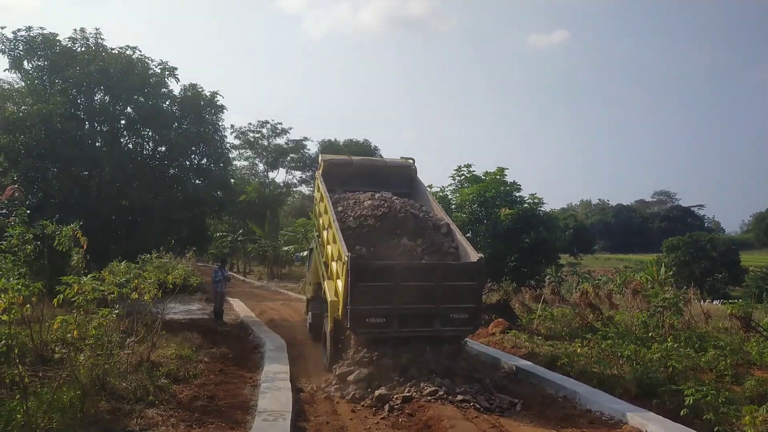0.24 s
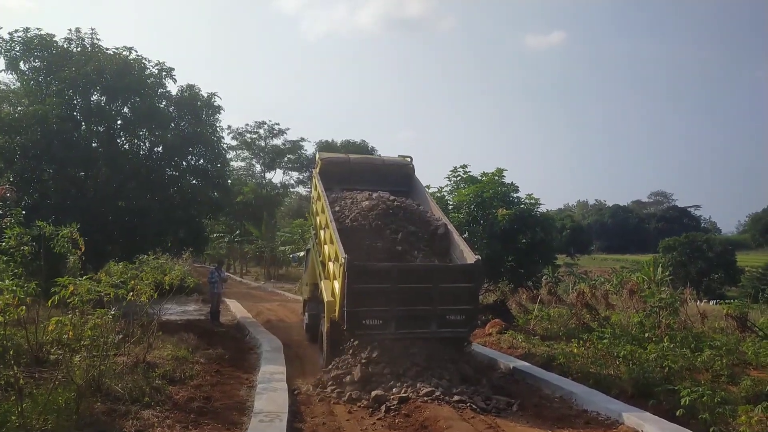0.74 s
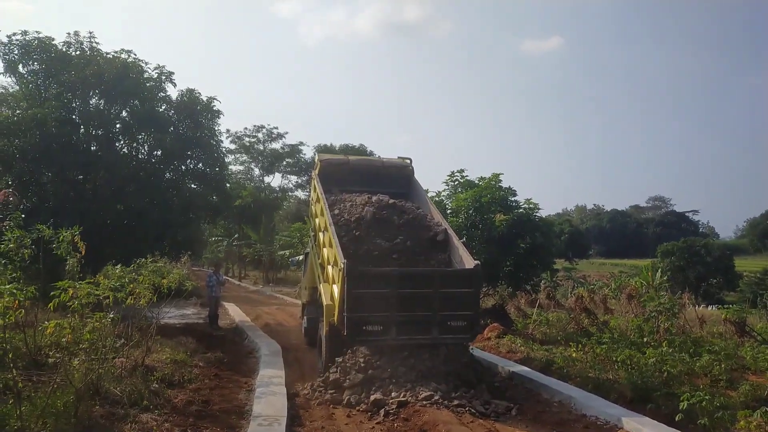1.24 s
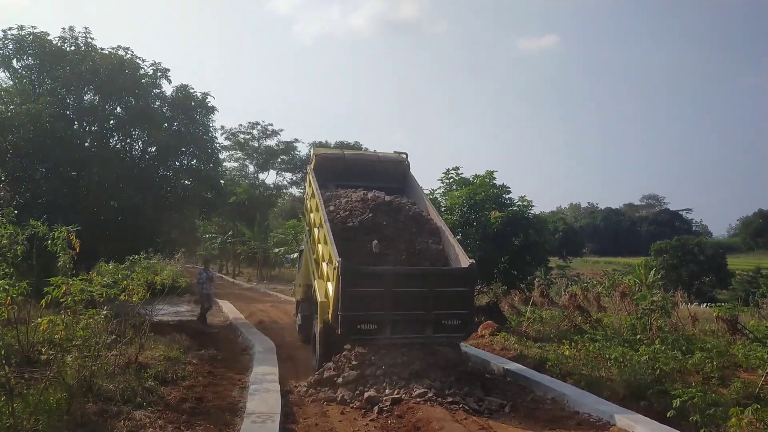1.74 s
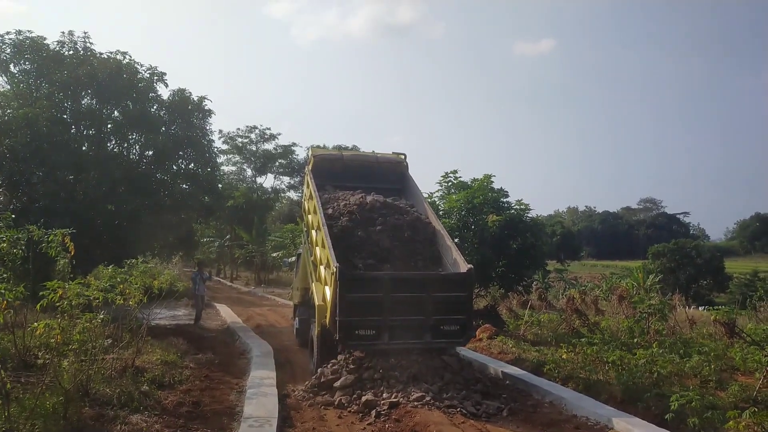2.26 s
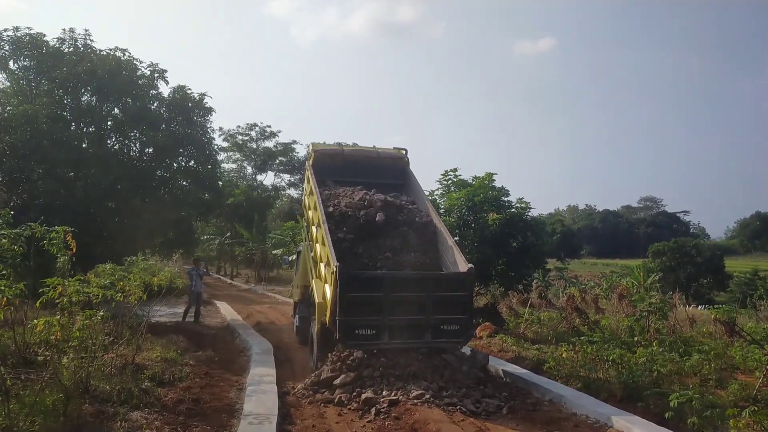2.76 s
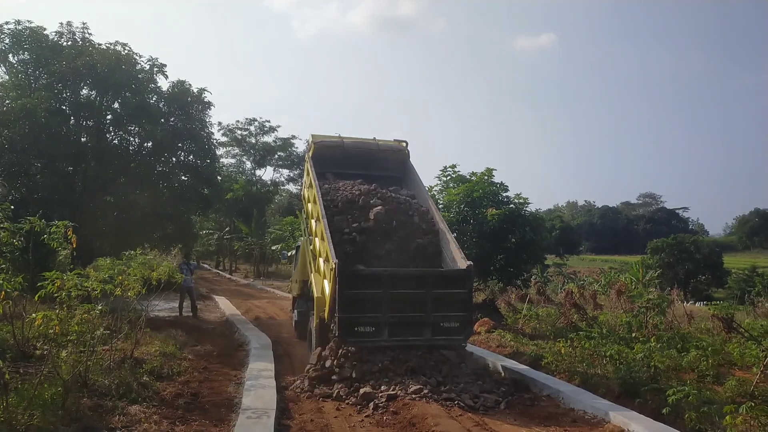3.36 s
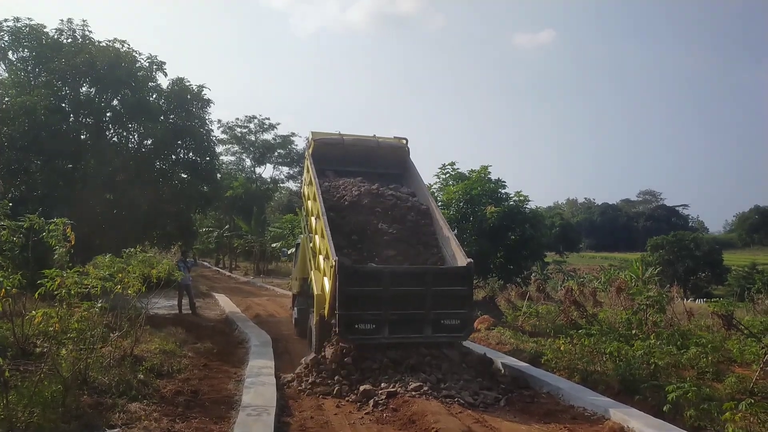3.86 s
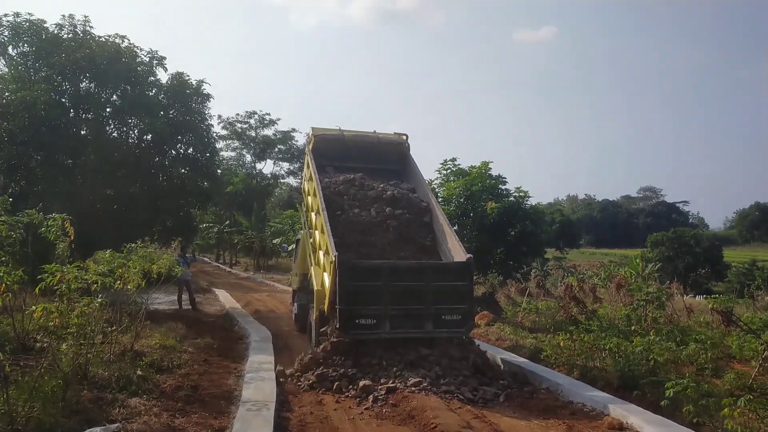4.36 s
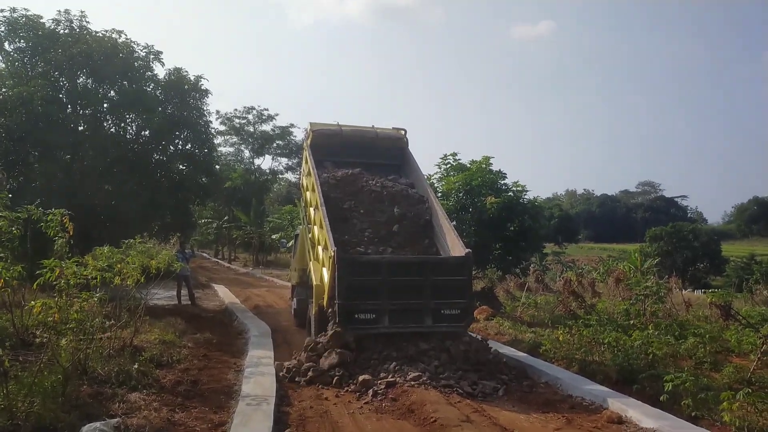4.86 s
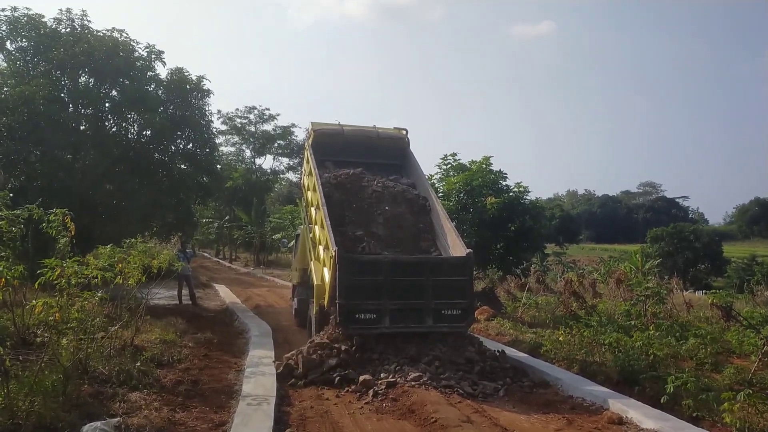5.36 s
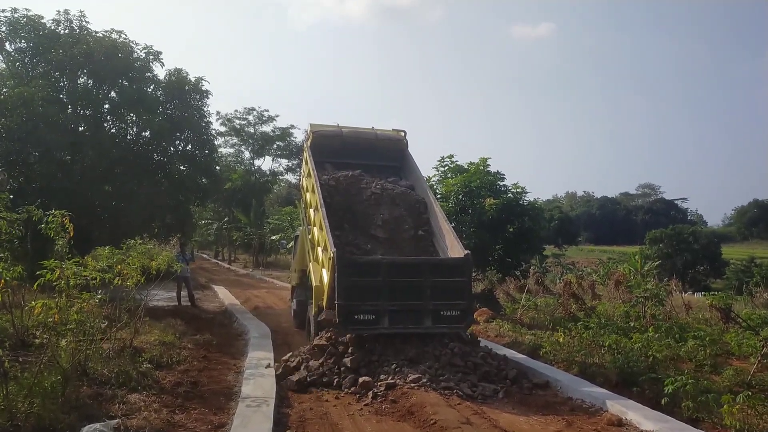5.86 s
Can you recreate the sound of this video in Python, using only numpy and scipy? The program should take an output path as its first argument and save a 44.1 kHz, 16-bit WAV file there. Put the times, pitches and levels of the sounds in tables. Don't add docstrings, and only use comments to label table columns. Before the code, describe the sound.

Rocks slide from the raised steel bed of a tipper truck outdoors. A dense burst of hollow metallic clangs and stone cracks opens at once, another follows before one second, then it thins to a gritty rattle. Near three seconds heavy crashes return and continue unevenly, with low thuds from the heap. A faint engine idle and wind rumble sit below; the single microphone is some way off, with a faint echo from trees.

```python
import sys
import numpy as np
from scipy import signal
from scipy.fft import rfft, irfft, next_fast_len
from scipy.io import wavfile
from scipy.ndimage import uniform_filter1d, minimum_filter1d, map_coordinates

SR = 44100
rng = np.random.default_rng(int(sys.argv[2]) if len(sys.argv) > 2 else 0)


def bounce(signal):
    frames = np.transpose(np.atleast_2d(signal))
    limited = np.clip(frames, -1, 1)
    pcm = np.round(limited * 32767).astype(np.int16)
    wavfile.write(sys.argv[1], SR, pcm)


def nominal_scale(level):
    x = np.asarray(level, float) / 20
    return 10 ** x


N = 269451


def unit(x):
    return x / np.sqrt(np.mean(x ** 2) + 1e-20)


def along(points, hz):
    f, v = np.transpose(points)
    return np.interp(np.log(hz + 1), np.log(f + 1), v)


def curves(rows):
    s, *cols = np.transpose(rows)
    return [np.interp(np.arange(N) / SR, s, c) for c in cols]


def wobble(rate):
    return map_coordinates(rng.standard_normal(N // 100), [np.arange(N) * rate / SR])


def filtered(x, response):
    m = next_fast_len(x.shape[-1] + 8192)
    return irfft(rfft(x, m) * response(np.fft.rfftfreq(m, 1 / SR)), m)[..., :x.shape[-1]]


def coloured(x, spectrum):
    return unit(filtered(x, lambda hz: nominal_scale(along(spectrum, hz))))


def resonances(modes):
    def response(f):
        total = 0
        for k, (c, w, db) in enumerate(modes):
            total = total + (-1) ** k * nominal_scale(db) * 1j * f * w / (c * c - f * f + 1j * f * w)
        return total
    return response


def lay(start, rings):
    k = np.arange(rings.shape[1])
    return np.bincount((start + k).ravel(), rings.ravel(), N)[:N]


def samples(s):
    return np.round(s * SR).astype(int)


def aftermath(events, db, t60):
    starts = [round(row[0] * SR) for row in events]
    kicks = np.bincount(starts, [nominal_scale(2 * (row[1] + db)) for row in events], N)
    return signal.lfilter([1], [1, -nominal_scale(-120 / (t60 * SR))], kicks)


HEAVY_HZ, THIN_HZ = 850, 1680
# (f/Hz, width/Hz, level/dB)
BED = [(512, 28, -1.5), (655, 75, -1), (964, 102, -0.5), (1320, 136, 0.5), (1580, 74, -3), (1870, 180, 1.5),
       (1943, 243, 0), (2310, 195, -2.5), (2810, 680, -12), (3450, 58, -9.5), (3920, 340, -20)]
# (f/Hz, level/dB)
GRIT = [(2060, -3.5), (3500, -3.5), (5150, -8.5), (6940, -9), (8110, -6), (9480, -14.5), (11800, -14),
        (14800, -13), (15500, -5)]
# (t/s, level/dB, stone crack share/dB, fade by 60 dB/s)
ON_FLOOR = [(.093, -26, -31, 0.1), (.202, -8, -30, 0.16), (.253, -10, -36, 0.059), (.732, -18, -24, 0.2),
            (.939, -19.5, -18, 0.27), (1.147, -11.5, -46, 0.14), (2.438, -18, -22, 0.25),
            (2.831, -15.5, -12.5, 0.33), (3.088, -10, -50, 0.54), (3.344, -11, -40, 0.19),
            (3.748, -11.5, -35, 0.21), (3.837, -13.5, -21, 0.16), (3.872, -20.5, -17, 0.36),
            (3.97, -14, -26, 0.13), (4.116, -16.5, -37, 0.39), (4.161, -18.5, -26, 1),
            (4.37, -14.5, -35, 0.33), (4.495, -26, -32, 0.13), (4.727, -14, -42, 0.035),
            (5.6, -29, -32, 0.1), (5.893, -12, -43, 0.15), (5.438, -17, -25, 0.11)]
# (t/s, level/dB, stone crack share/dB, fade by 60 dB/s)
ON_FRAME = [(.006, -4, -37, 0.17), (.157, -9.5, -22.5, 0.26), (.175, -7.5, -29, 0.2),
            (.337, -6.5, -24.5, 0.22), (.413, -13, -38, 0.35), (.745, -6.5, -24.5, 0.14),
            (.884, -16.5, -24.5, 0.3), (2.049, -16, -49, 0.11), (2.218, -23.5, -23, 0.3),
            (2.281, -18.5, -37, 0.053), (2.31, -9, -28, 0.21), (2.342, -12, -28.5, 0.069),
            (2.841, -8.5, -35, 0.21), (2.914, -3.5, -51, 0.17), (3.166, -8.5, -27.5, 0.17),
            (3.294, -8.5, -32, 0.14), (3.437, -16.5, -40, 0.091), (3.576, -1, -28, 0.072),
            (3.619, -13.5, -29, 0.28), (3.812, -17.5, -44, 0.23), (4.263, -17.5, -25, 0.32),
            (4.3, -7.5, -26.5, 0.17), (4.686, -21, -49, 0.48), (4.835, -16.5, -32, 0.58),
            (4.894, -16, -13.5, 0.11), (5.225, -9.5, -31, 0.089), (5.483, -18, -26, 0.24),
            (5.749, -16, -21, 0.049), (5.758, -16, -29, 0.13), (6.063, -37, -41, 0.058)]
# (t/s, level/dB, stone crack share/dB, fade by 60 dB/s)
ON_WALLS = [(.137, -9, -36, 0.1), (.288, -10, -30.5, 0.53), (.343, -3, -36, 0.077), (.712, 3.5, -37, 0.063),
            (0.806, -9, -29, 0.057), (0.843, -4, -26, 0.18), (1.016, -11, -26.5, 0.69),
            (1.105, -18.5, -22.5, 0.62), (1.22, -12, -24, 0.059), (1.231, -8, -43, 0.061),
            (1.82, -22, -26, 0.077), (1.838, -12, -25, 0.33), (2.867, 2, -27, 0.1),
            (2.932, -22, -45, 0.069), (3.125, -12, -26, 0.32), (3.701, -10, -28, 0.055),
            (3.954, -11, -48, 0.11), (4.044, -17.5, -24.5, 0.36)]
# (t/s, level/dB, stone crack share/dB, fade by 60 dB/s)
ON_GATE = [(0.05, -14, -16, 0.098), (.461, -24, -14.5, 0.33), (0.52, -29, -11.5, 0.41),
           (.664, -28, -11, 0.23), (0.998, -23.5, -12, 0.16), (1.387, -38.5, -2, 0.24),
           (1.429, -30.5, -22, 0.18), (1.529, -24, -17.5, 0.28), (1.682, -36, -32, 0.15),
           (2.617, -41, 0, 0.19), (3.047, -20, -27, 0.4), (3.496, -17, -44, 0.067), (4.46, -28, -17, 0.34),
           (4.536, -35, -61, 0.078), (4.595, -31.5, -9.5, 0.17), (4.787, -26.5, -21, 0.072),
           (4.956, -29, -29, 0.43), (5.119, -15.5, -24.5, 0.14), (5.207, -17, -19.5, 0.25),
           (5.312, -17.5, -36, 0.17), (5.336, -23.5, -4.5, 0.052), (5.366, -25, -33, 0.3),
           (5.654, -33, -7, 0.16), (5.683, -26, -15, 0.053), (6.015, -30, -17, 0.083)]
# (heavy-panel level/dB, thin-panel level/dB)
SHARES = [
    (-7, -15),
    (-9.5, -6.5),
    (-23, -8),
    (-12, 5),
]


def shaken_bed(heavy_db, thin_db):
    modes = []
    for (hz, width, level), (shift, strength) in zip(BED, rng.standard_normal((len(BED), 2))):
        if hz < HEAVY_HZ:
            share = heavy_db + 14.5
        elif hz > THIN_HZ:
            share = thin_db + 8.0
        else:
            share = -1
        modes.append((hz * (1 + 0.015 * shift), width, level + share + 1.64 * strength))
    panels = resonances(modes)
    return lambda hz: panels(hz) / (1 + 1j * hz / 3500) / (1 - 1j * 400 / (hz + 1)) ** 2


def clashes():
    out, t = np.zeros(N + SR), np.arange(SR // 3) / SR
    for rows, shares in zip([ON_FLOOR, ON_FRAME, ON_WALLS, ON_GATE], SHARES):
        for s, db, crack_db, t60 in rows:
            fade_s = max(t60, .02)
            decay = nominal_scale(-60 * (t / fade_s) ** 1.306) * (1 - np.exp(-t / 0.0009))
            decay = decay * (1 + 0.47 * np.exp(-t / 0.068)) / 0.91
            chips = nominal_scale(2.5 * unit(uniform_filter1d(rng.standard_normal(len(t)), size=90)))
            crunch = decay * chips * rng.standard_normal(len(t))
            crunch[:4] += 6.5
            crunch = crunch / np.linalg.norm(crunch) * np.linalg.norm(decay)
            ring = filtered(crunch, shaken_bed(*shares))
            stone = [(hz, level + 3.1 * rng.standard_normal()) for hz, level in GRIT]
            crack = coloured(rng.standard_normal(len(t)), stone)
            crack = crack * nominal_scale(-55 * t / fade_s) * (1 - np.exp(-t / 0.0002))
            out[round(s * SR):][:len(t)] += nominal_scale(db - 4.0) * ring + nominal_scale(db + crack_db + 3.5) * crack
    return out[:N]


# (t/s, level/dB, f/Hz, fade by 60 dB/s)
DEEP_KNOCKS = [(0.05, -7.5, 1009, 0.066), (0.156, -12.5, 641, 0.095), (0.175, -16, 890, 0.047),
               (0.202, -11, 660, 0.14), (0.254, -14, 640, 0.057), (0.343, -11, 633, 0.09),
               (0.841, -24, 910, 0.11), (0.931, -19, 567, 0.2), (1.221, -16.5, 922, 0.14),
               (1.845, -17, 873, 0.05), (2.049, -24, 685, 0.045), (2.311, -1.5, 675, 0.034),
               (2.84, -18.5, 638, 0.19), (2.871, -24, 1000, 0.15), (2.917, -6.5, 650, 0.14),
               (3.088, -17.5, 644, 0.16), (3.3, -17, 633, 0.07), (3.344, -5, 542, 0.043),
               (3.576, -10.5, 851, 0.1), (3.7, -14, 848, 0.1), (3.748, -28, 670, 0.068),
               (3.876, -25, 633, 0.095), (3.969, -17.5, 662, 0.13), (4.116, -24, 680, 0.044),
               (4.302, -17, 656, 0.27), (4.495, -17.5, 673, 0.09), (4.727, -20, 721, 0.1),
               (5.234, -18, 649, 0.13), (5.756, -14, 666, 0.084), (5.894, -19, 540, 0.13),
               (6.093, -20, 670, 0.09)]
# (t/s, level/dB, f/Hz, fade by 60 dB/s)
MID_KNOCKS = [(0.051, -12, 1310, 0.075), (0.1376, -22, 1290, 0.07), (0.174, -10, 1280, 0.061),
              (0.336, -8, 1346, 0.08), (0.7104, -10, 1292, 0.067), (0.842, -5.5, 1283, 0.037),
              (0.945, -15, 1315, 0.064), (1.01, -24, 1044, 0.07), (1.1516, -16, 1320, 0.061),
              (1.222, -15.5, 1355, 0.16), (1.837, -18, 1400, 0.048), (2.0515, -16, 1360, 0.049),
              (2.835, -20, 1267, 0.12), (2.914, -23, 1710, 0.07), (2.938, -6, 1284, 0.042),
              (3.0876, -14, 975, 0.077), (3.167, -17, 1450, 0.062), (3.494, -29, 1390, 0.079),
              (3.5053, -15, 1320, 0.041), (3.572, -9, 1380, 0.092), (3.703, -7, 1292, 0.038),
              (3.8437, -23, 1350, 0.051), (3.973, -19.5, 1240, 0.05), (4.301, -10.5, 1325, 0.095),
              (4.5385, -27, 1640, 0.064), (4.842, -21.5, 1326, 0.14), (5.118, -19, 1320, 0.06),
              (5.2078, -23, 1370, 0.066), (5.226, -17, 1425, 0.065), (5.749, -22, 1320, 0.15)]
# (t/s, level/dB, f/Hz, fade by 60 dB/s)
THIN_KNOCKS = [(0.0503, -9, 2360, 0.065), (0.1376, -12, 1870, 0.049), (0.1745, -15, 2330, 0.065),
               (0.2084, -19, 2030, 0.075), (0.2887, -20, 2280, 0.073), (0.3432, -18, 2280, 0.052),
               (0.462, -21, 1910, 0.06), (0.7139, -5.5, 1830, 0.053), (0.8066, -15, 1940, 0.044),
               (0.8415, -9.5, 2310, 0.057), (0.998, -15, 1990, 0.06), (1.2206, -21, 1910, 0.045),
               (1.8382, -25, 2050, 0.047), (2.3096, -21, 2380, 0.05), (2.8404, -20, 2160, 0.072),
               (2.868, -4.5, 1840, 0.065), (2.9141, -12, 1830, 0.078), (3.0485, -16, 1900, 0.061),
               (3.126, -19, 1840, 0.14), (3.1672, -12, 2310, 0.042), (3.2949, -14.5, 2105, 0.13),
               (3.4974, -15, 2240, 0.065), (3.5788, -7, 2140, 0.057), (3.7045, -14, 2156, 0.04),
               (4.1607, -16.5, 1900, 0.048), (4.3004, -6, 1956, 0.03), (4.4124, -23, 2290, 0.06),
               (4.5371, -17, 2410, 0.039), (4.8359, -21, 2280, 0.06), (4.8948, -21, 1760, 0.075),
               (5.1183, -14.5, 2230, 0.05), (5.2071, -16, 2280, 0.058), (5.3123, -11, 1990, 0.04),
               (5.3354, -21, 2410, 0.057), (5.365, -22, 2460, 0.06), (5.7513, -23, 2150, 0.066)]
# (t/s, level/dB, f/Hz, fade by 60 dB/s)
CLINKS = [
    (0.138, -20.5, 3300, 0.073),
    (0.713, -9, 3240, 0.036),
    (0.8435, -17, 3360, 0.046),
    (2.2857, -25, 3670, 0.057),
    (2.8679, -28, 3500, 0.06),
    (2.9128, -17, 3010, 0.065),
    (3.8437, -23.5, 3290, 0.073),
    (5.3373, -25, 2990, 0.055),
]
# (t/s, level/dB, f/Hz, fade by 60 dB/s)
THUDS = [
    (2.225, -21, 132, 0.13),
    (2.919, -20, 339, 0.1),
    (3.29, -20, 247, 0.096),
    (5.188, -18, 174, 0.14),
    (5.749, -24, 300, 0.1),
]
# (t/s, level/dB, f/Hz, fade by 60 dB/s)
BOUNCES = [
    (0.736, -12.5, 1496, .08),
    (0.747, -17.5, 1900, 0.064),
    (0.847, -9, 2810, 0.065),
    (0.854, -13, 1855, 0.072),
]


def knocks():
    rows = DEEP_KNOCKS + MID_KNOCKS + THIN_KNOCKS + CLINKS + THUDS + BOUNCES
    s, db, hz, t60 = np.transpose(rows)[..., None]
    t, chance = np.arange(SR // 7) / SR, rng.standard_normal((len(s), 2))
    steps = rng.standard_normal((len(s), len(t)))
    stumble = 0.029 * np.sqrt(hz / HEAVY_HZ) * np.cumsum(steps, axis=1)
    main = np.sin(2 * np.pi * hz * t + stumble)
    twin_hz = hz * (1 + 0.046 * chance[:, :1])
    twin = nominal_scale(-2) * np.sin(2 * np.pi * twin_hz * t + 2 * chance[:, 1:])
    decay = nominal_scale(db - 9 - 60 * (t / np.maximum(t60, .015)) ** 1.15)
    rise = 1 - np.exp(-t * hz / 1.2)
    return lay(samples(s), decay * rise * (main + twin))


# (t/s, level/dB, centre f/Hz)
SNAPS = [(.0515, -5, 1510), (0.137, -15, 1800), (.1755, -9, 1100), (.2035, -15, 910), (.3435, -12, 1800),
         (.462, -17, 1810), (.5225, -25, 2000), (.747, -8, 2010), (1.017, -13, 1700), (1.0775, -22, 1600),
         (1.3875, -25, 1880), (1.4315, -28, 2740), (1.443, -26, 2120), (1.491, -27, 1960),
         (1.6845, -30, 1930), (1.788, -35, 1900), (1.812, -25, 1810), (1.838, -15, 1480),
         (2.0265, -24, 990), (2.129, -43, 2700), (2.186, -28, 1400), (2.3105, -17, 683), (2.554, -27, 2090),
         (2.992, -16, 970), (3.1675, -13, 1780), (3.2932, -23, 1970), (3.439, -18, 1290),
         (3.582, -15, 1110), (4.163, -24.5, 1950), (4.538, -21, 2000), (4.688, -26, 1980), (4.7, -22, 810),
         (4.788, -34, 2200), (4.864, -17, 1510), (5.119, -14, 2000), (5.226, -18, 1425), (5.313, -19, 2090),
         (6.017, -20, 1750), (6.0635, -20, 1610), (6.094, -29, 700)]


def snaps():
    s, db, hz = np.transpose(SNAPS)[..., None]
    t, chance = np.arange(SR // 20) / SR, rng.uniform(-1, 1, (len(s), 5, 1))
    places = np.linspace(-1, 1, 5)[:, None] + chance / 5
    mode_hz = hz[:, None] * np.exp(0.34 * places)
    modes = np.sin(2 * np.pi * mode_hz * t).sum(axis=1)
    decay = nominal_scale(db - 9.5 - 60 * t / 0.024)
    rise = 1 - np.exp(-t / 0.00064)
    return lay(samples(s), decay * rise * modes)


# (t/s, level/dB, f/Hz, fade by 60 dB/s)
LANDINGS = [(0.161, -27, 178, 0.2), (0.334, -16.5, 290, 0.066), (0.743, -31, 226, 0.18),
            (0.93, -22.5, 107, 0.32), (1.837, -14.5, 91, 0.16), (2.308, -12, 99, 0.21),
            (2.337, -25, 95, 0.18), (2.4, -25.5, 98, 0.33), (2.638, -25, 145.6, 0.24),
            (2.835, -22.5, 210, 0.17), (2.914, -31, 219, 0.2), (3.155, -13, 296, 0.029),
            (3.764, -15.5, 114, 0.11), (3.968, -9.5, 125, 0.059), (4.008, -14.5, 110, 0.097),
            (4.154, -11, 275, 0.056), (4.169, -13, 113, 0.11), (4.193, -15.5, 109, 0.078),
            (4.3, -17, 107, 0.23), (4.301, -19, 294, 0.09), (4.897, -20, 99, 0.12),
            (4.905, -17.5, 176, 0.15), (4.946, -18.5, 93, 0.084), (5.366, -8.5, 234, 0.088),
            (5.37, -7.5, 77, 0.1), (5.418, -13.5, 90, 0.11), (5.946, -14.5, 79.5, 0.27),
            (5.948, -23, 214, 0.13), (6.089, -13, 116, 0.16)]
# (t/s, level/dB, f/Hz, fade by 60 dB/s)
PUSHES = [(0.284, -19, 65, 0.064), (0.76, -22, 59.5, 0.21), (2.457, -43, 70, 0.1), (3.699, -18, 50, 0.15),
          (4.82, -24.5, 55.4, 0.26), (5.256, -21.5, 116.6, 0.45), (5.951, -22, 39.7, .15),
          (2.696, -18, 43.6, 0.092), (3.093, -25, 69.5, 0.11), (3.343, -21, 72.6, 0.1),
          (4.048, -10.5, 52.5, 0.15), (5.086, -16.5, 53, 0.025), (5.184, -14.5, 40.4, 0.055),
          (5.316, -10.5, 66, 0.094), (5.356, -9.5, 41.5, 0.11), (5.688, -14, 39.7, 0.13)]
# (f/Hz, level/dB)
RUMBLE = [(41, -54), (70, -2), (102, -7.5), (140, -1.5), (232, -4.5), (318, -9), (367, -17), (420, -15),
          (550, -27), (920, -120)]


def booms():
    out, t = np.zeros(N + SR), np.arange(SR // 2) / SR
    for rows, crunch_share in [(LANDINGS, 0.41), (PUSHES, 0.32)]:
        for s, db, hz, t60 in rows:
            decay = nominal_scale(-60 * t / max(t60, .03)) * (1 - np.exp(-t / 0.0011))
            drift = 0.5 * unit(uniform_filter1d(rng.standard_normal(len(t)), size=1500))
            swing = np.sin(2 * np.pi * hz * t + drift)
            crunch = coloured(rng.standard_normal(len(t)), RUMBLE)
            boom = decay * (swing + crunch_share * crunch)
            out[round((s + .0015) * SR):][:len(t)] += nominal_scale(db - 2.0) * boom
    return out[:N]


# (t/s, small stones level/dB, dust over stones/dB, weight over stones/dB)
SLIDE = [(0.0, -27.5, -1, -31), (0.22, -29.5, -1.5, -7), (0.49, -40.5, -2, -3.5), (0.75, -36.5, -2.5, -19),
         (0.9, -30.5, -5, -8), (1.05, -31, -5, -10), (1.29, -38, -5.5, -7), (1.99, -42.5, -6.5, -0.5),
         (2.89, -37.5, -5.5, -5), (3.03, -34.5, -8.5, 2), (3.42, -34, -5.5, -2.5), (3.69, -32, -6.5, -8.5),
         (4.37, -37, -9.5, 7.5), (4.53, -36, -10, -7.5), (5.02, -40, -5, -15), (5.34, -37.5, -9, 3),
         (5.68, -40, -9.5, 5), (6.11, -38, -10, -1.5)]
# (t/s, level/dB)
WIND = [(0, -58), (.3, -33.5), (.6, -40), (1.1, -34), (1.5, -38.5), (2.2, -37), (2.7, -28), (2.9, -33.5),
        (3.1, -31), (3.5, -43), (3.8, -33.5), (4.1, -28), (4.4, -31.5), (4.7, -43), (5, -32.5),
        (5.4, -26.5), (5.8, -31), (6.11, -27)]


def flow():
    slide_db, dust_db, weight_db = curves(SLIDE)
    shower = aftermath(ON_FLOOR + ON_FRAME + ON_WALLS + ON_GATE, db=-23.5, t60=0.3)
    stones_db = 10 * np.log10(nominal_scale(2 * slide_db) + shower)
    usual_db = stones_db.mean()
    grit_db = usual_db + 0.42 * (stones_db - usual_db) + dust_db
    idle, load = nominal_scale(2 * -63), nominal_scale(2 * (stones_db + weight_db))
    rolling = aftermath(LANDINGS, db=-22, t60=0.65)
    return stones_db, grit_db, 10 * np.log10(idle + load + rolling), curves(WIND)[0]


def grainy(rate, spread_db, t60):
    chance, size = rng.random(N), rng.exponential(size=N)
    contacts = (chance < rate / SR) * nominal_scale(2 * spread_db * np.minimum(size, 2.5))
    power = signal.lfilter([1], [1, -nominal_scale(-120 / (t60 * SR))], contacts)
    return np.sqrt(power + 0.53 * power.mean()) * rng.standard_normal(N)


def patchy(x, depth_db):
    z = signal.stft(x, nperseg=256)[2]
    field = uniform_filter1d(rng.standard_normal(z.shape), size=8, axis=0)
    field = uniform_filter1d(field, size=8, axis=1)
    return signal.istft(z * nominal_scale(depth_db * unit(field)), nperseg=256)[1][:N]


def pebbles(rate, centre_hz, spread, cycles, spread_db):
    count = round(rate * N / SR)
    hz = np.clip(centre_hz * np.exp(spread * rng.standard_normal((count, 1))), 400, 15500)
    chance = rng.random((count, 2))
    start = (chance[:, :1] * N).astype(int)
    size = np.minimum(-np.log(chance[:, 1:] + 1e-9), 3)
    k = np.arange(600)
    decay = nominal_scale(spread_db * size) * np.exp(-k * hz / (cycles * SR))
    return unit(lay(start, decay * np.sin(2 * np.pi * hz * k / SR)))


# (f/Hz, level/dB)
STREAM = [(210, -11.5), (340, -8), (396, -19.5), (540, -1.5), (631, -2), (713, -1), (815, -4.5), (1010, -4),
          (1080, -5.5), (1720, -4), (1940, 0), (2800, -6.5), (5000, -30), (6500, -58), (11000, -120)]


def stream(stones_db, grit_db):
    rattle = unit(grainy(110, spread_db=1.1, t60=0.06))
    blows = (rng.random(N) < 500 / SR) * np.clip(rng.standard_normal(N), -2, 2) ** 3
    thin = [(hz, 1.26 * width, db) for hz, width, db in BED if hz > 1200]
    ticks = unit(filtered(blows, resonances(thin)))
    stones = unit(coloured(patchy(rattle, depth_db=1.5), STREAM) + 0.48 * ticks)
    heavy = filtered(stones, lambda hz: 1 / (1 + (hz / 1050) ** 6))
    extra = nominal_scale(0.55 * (stones_db - stones_db.mean())) - 1
    stones = nominal_scale(stones_db) * (stones + heavy * extra)
    chips = pebbles(500, centre_hz=6960, spread=.5, cycles=15, spread_db=9)
    grit = rng.standard_normal(N) + 0.038 * rattle + 0.32 * chips
    return stones + nominal_scale(grit_db) * coloured(patchy(grit, depth_db=1.5), GRIT)


def engine(rumble_db):
    firing_hz = 38.7 * (1 + 0.01 * wobble(4.1))
    throb = 1 + .12 * np.cos(2 * np.pi * np.cumsum(firing_hz) / SR)
    lumps_db = 4.6 * wobble(15)
    noise = coloured(rng.standard_normal(N), RUMBLE)
    return nominal_scale(rumble_db - 5.0 + lumps_db) * unit(throb * noise)


# (f/Hz, level/dB)
BUFFET = [(8.8, -11), (15, -8), (48, -9.5), (110, -10), (140, -22.5), (240, -120)]


def wind(buffet_db):
    lumps = nominal_scale(4.2 * wobble(5.2))
    return nominal_scale(buffet_db - 1.0) * unit(lumps * coloured(rng.standard_normal(N), BUFFET))


def trees(x):
    t = np.arange(SR // 2) / SR
    tail = rng.standard_normal(len(t)) * nominal_scale(-60 * t / 0.54) * (t > .012)
    return signal.fftconvolve(x, tail / np.linalg.norm(tail))[:N]


def scene():
    stones_db, grit_db, rumble_db, buffet_db = flow()
    rocks = clashes()
    echo = nominal_scale(-18) * trees(rocks)
    around = booms() + stream(stones_db, grit_db) + engine(rumble_db) + wind(buffet_db)
    return (rocks + echo + around + knocks() + snaps())[None]


def band_limit(x):
    return signal.sosfilt(signal.butter(12, 16810, fs=SR, output="sos"), x)


def record(dry):
    needed = np.minimum(1, .49 / (np.abs(dry) + 1e-9))
    gain = uniform_filter1d(minimum_filter1d(needed, size=301), size=150)
    mix = filtered(dry * gain, lambda hz: hz < 15520)
    return band_limit(mix)


dry = scene()
out = record(dry)
bounce(out)
```